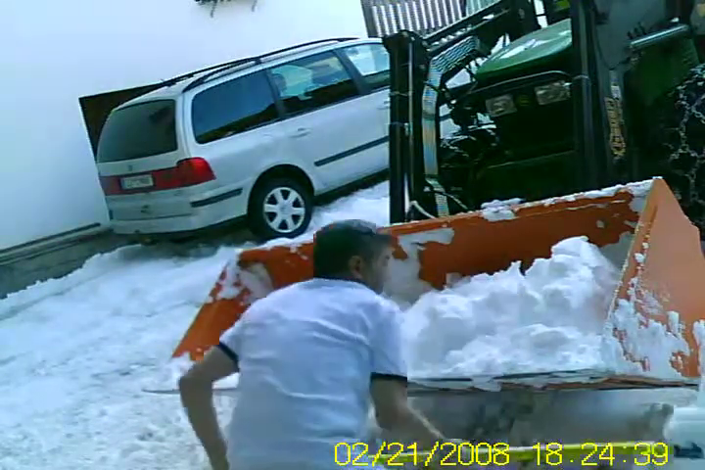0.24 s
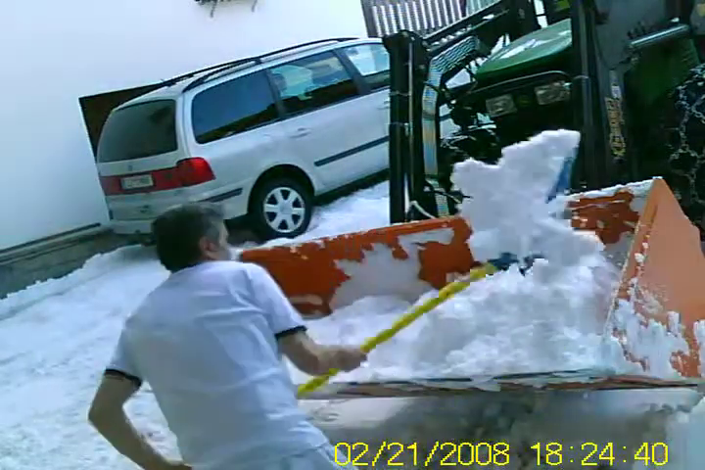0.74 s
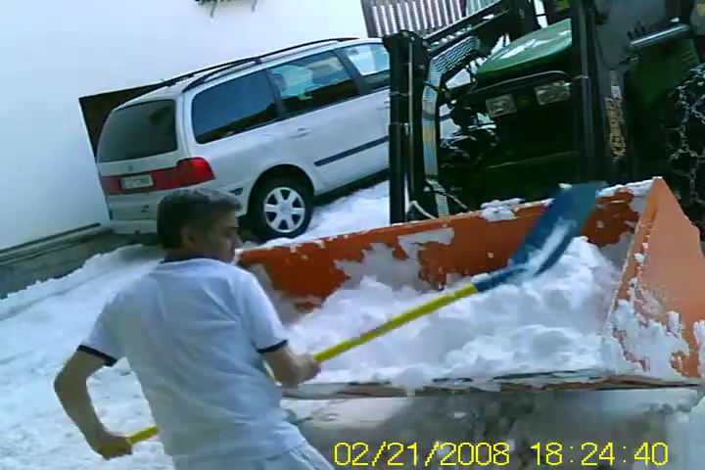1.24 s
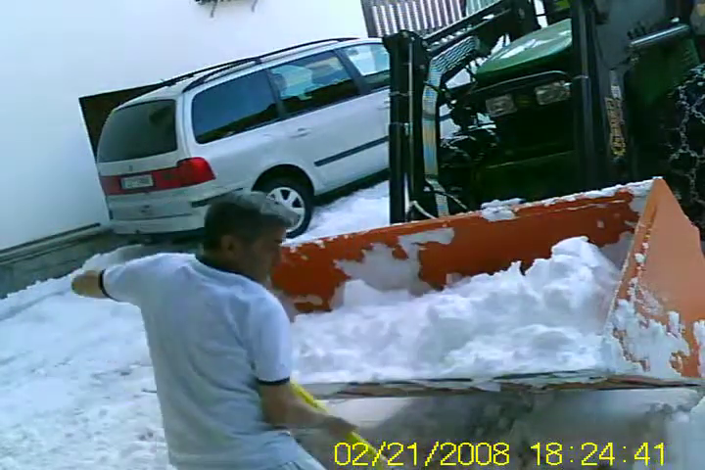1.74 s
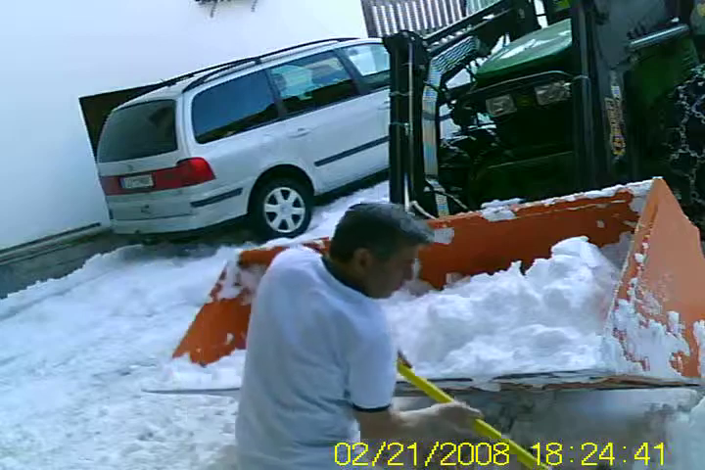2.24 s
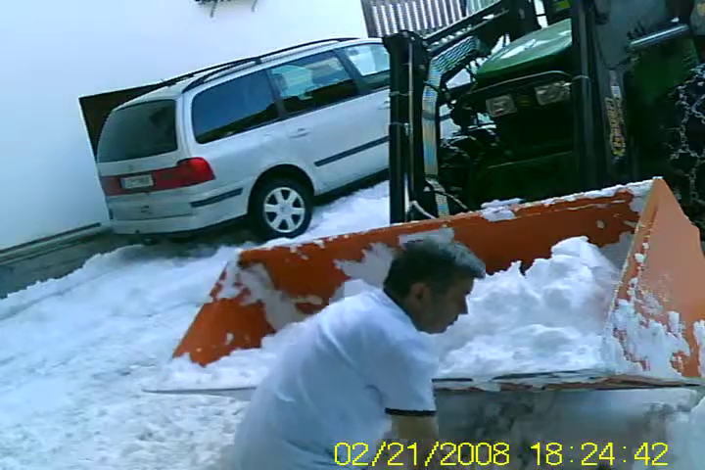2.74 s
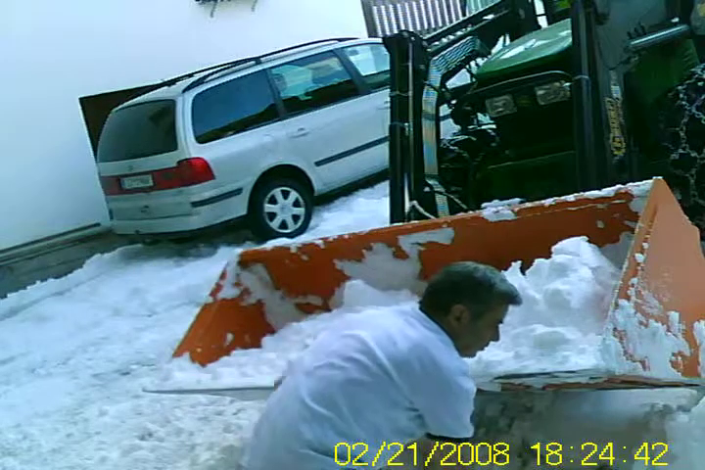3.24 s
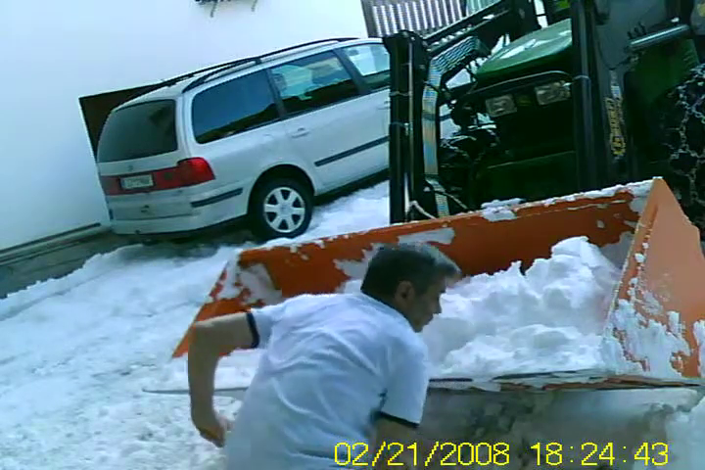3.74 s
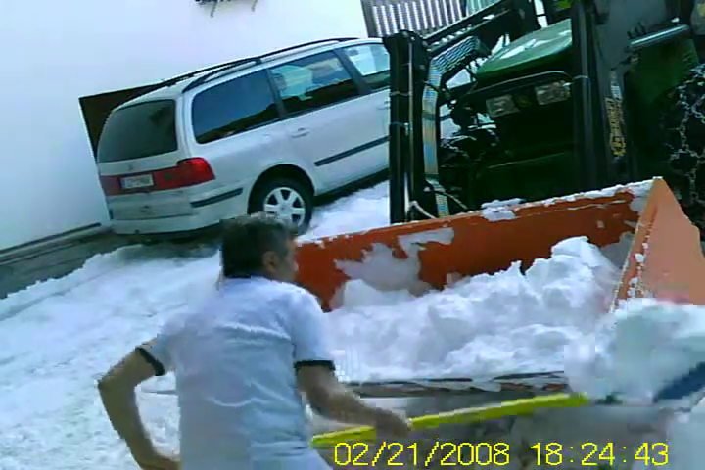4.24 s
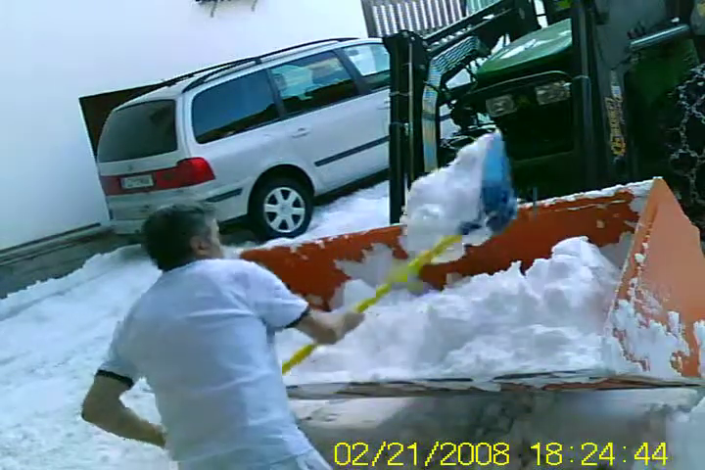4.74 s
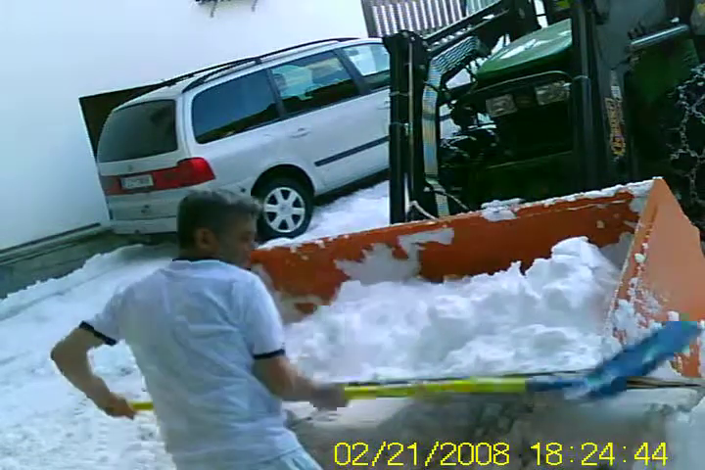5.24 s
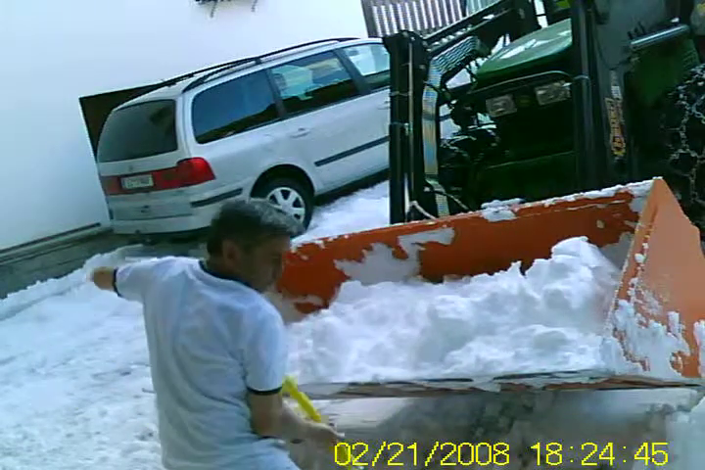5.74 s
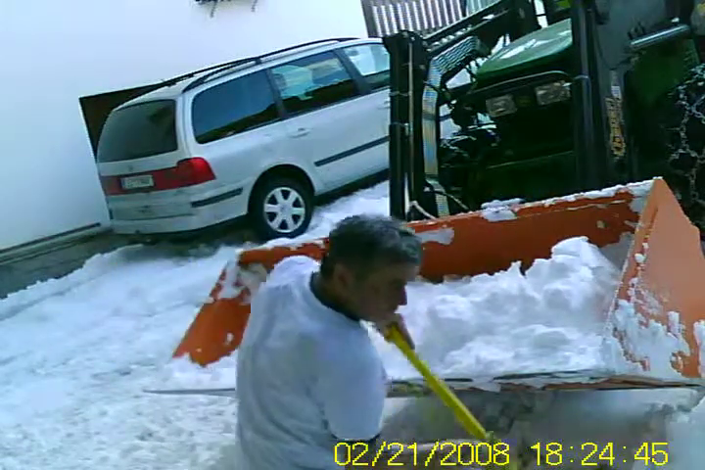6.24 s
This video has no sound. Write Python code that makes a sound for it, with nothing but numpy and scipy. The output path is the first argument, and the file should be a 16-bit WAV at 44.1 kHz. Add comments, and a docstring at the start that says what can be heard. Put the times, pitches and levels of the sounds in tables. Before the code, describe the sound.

Faint hiss and a low rumble of air fill a lightly echoing yard. A small bird, some way off, chirps briefly about once a second until 5.5 seconds. Close by, a shovel knocks softly at 0.4 seconds, and wet snow slides off and lands around 1 second. At 1.9 seconds the blade skids over icy grit, catches with a rattling clang at 2 and stops with a tiny squeak at 2.3. A heavy, crunching thump of snow comes at 3.3. The blade knocks hollowly on its shaft at 4.4, and another load lands with a crisp crunch at 5. From about 5.8 seconds the blade brushes and skids again, then at 6.1 crashes against a steel tractor bucket. This is the loudest moment, slightly overloading the microphone, and the bucket rings and growls under the scraping until about 6.5 seconds.

```python
"""A small bird chirps over faintly rumbling air while snow is shovelled into a steel tractor bucket.
Twice the blade skids over icy ground, sticking and slipping on grit, and catches with a rattling clang,
the second time hard against the bucket, which rings and growls. Loads of wet snow knock the blade on its
shaft, slide off and land with a thump and a crunch of breaking crystals. House walls echo round the yard."""
import sys
import numpy as np
from scipy import signal
from scipy.fft import rfft, irfft, next_fast_len
from scipy.io import wavfile

SR = 44100
rng = np.random.default_rng(int(sys.argv[2]) if len(sys.argv) > 2 else 0)


def put_to_file(sound):
    """Save the sound as 16-bit audio at rate SR, in the file named by the first command-line argument."""
    columns = np.atleast_2d(sound).T  # one column per channel
    safe = np.clip(columns, -1, 1)
    whole_steps = np.round(safe * 32767)
    wavfile.write(sys.argv[1], SR, whole_steps.astype(np.int16))


N = 287091
TIME = np.arange(N) / SR

# Pushes of the blade. Each row: touch-down, catch and stop in seconds, then the levels of skid,
# singing, ploughing, judder and contact with the bucket in dB.
PUSHES = [(1.863, 2.038, 2.315, -45.5, -60, -47, -42, -21), (5.877, 6.119, 6.45, -49, -51, -32.5, -45, 8)]
# The steel bucket's modes. Each row: frequency in Hz, relative level in dB, free t60 in seconds.
BUCKET_MODES = [(203, -17, .8), (363, 0, .7), (405, -5, .3), (446, 1, .42), (490, -6, .3), (560, -6, .25),
                (623, -2, .4), (690, -5, .3), (767, 3, .33), (821, 2, .33), (877, -4, .25), (965, -5, .25),
                (1255, -3, .2), (1318, -2, .18), (1447, 1, .2), (1520, 0, .18), (1590, -2, .18),
                (1685, -7, .22), (1853, -5, .22), (2147, -12, .16), (2452, -13, .12)]


def from_db(db):
    """Decibels to gain."""
    return 10 ** (np.asarray(db) / 20)


def rms_one(x):
    """Scale to an rms of 1."""
    return x / np.sqrt(np.mean(x ** 2) + 1e-20)


def coloured(x, spectrum):
    """Shape a steady signal with a spectrum that falls away beyond its ends; rms 1."""
    hz, db = np.transpose(spectrum)
    size = next_fast_len(N)
    log_hz = np.log(np.maximum(np.arange(size // 2 + 1) * SR / size, 1))
    skirts = np.minimum(log_hz - np.log(hz[0]), 0) + np.minimum(np.log(hz[-1]) - log_hz, 0)
    gain = from_db(np.interp(log_hz, np.log(hz), db) + 20 * skirts)
    return rms_one(irfft(rfft(x, size) * gain, size)[:N])


def low_pass(x, hz, order=2):
    """Causal low-pass."""
    return signal.sosfilt(signal.butter(order, hz, fs=SR, output="sos"), x + 1e-18)


def high_pass(x, hz, order=2):
    """Causal high-pass."""
    return signal.sosfilt(signal.butter(order, hz, "high", fs=SR, output="sos"), x + 1e-18)


def rising(s, length):
    """Envelope that climbs from 0 to 1, starting at time s."""
    return np.clip((TIME - s) / length, 0, 1)


def dying(s, t60):
    """Envelope that jumps to 1 at time s and dies away."""
    age = TIME - s
    return (age >= 0) * from_db(-60 * np.clip(age / t60, 0, 3))


def swells(rows):
    """Bell-shaped swells. Each row: centre and half length in seconds, peak level in dB."""
    return sum(from_db(db) * np.exp(-.5 * np.minimum(((TIME - s) / half) ** 2, 100))
               for s, half, db in rows)


def clicks(times, gains):
    """A train of single-sample blows."""
    out = np.zeros(N)
    out[np.clip(np.round(np.asarray(times) * SR).astype(int), 0, N - 1)] = gains
    return out


def ring(drive, hz, t60):
    """One mode: a unit click sets a sine of height 1 ringing."""
    r, w = np.exp(-np.log(1000) / (t60 * SR)), 2 * np.pi * hz / SR
    return signal.lfilter([0, np.sin(w)], [1, -2 * r * np.cos(w), r * r], drive + 1e-18)


def struck(times, blow_db, modes, scatter_db):
    """Every blow meets each mode with a strength and sign of its own."""
    total = np.sqrt(np.sum(from_db(np.array(modes)[:, 1]) ** 2) / 2)
    out = np.zeros(N)
    for hz, db, t60 in modes:
        strength, side = rng.standard_normal((len(times), 2)).T
        gains = np.sign(side) * from_db(blow_db + db + scatter_db * strength)
        out += ring(clicks(times, gains), hz, t60)
    return out / total


def dense_modes(times, blow_db, spectrum, t60):
    """Dying bursts of coloured noise, like the countless close modes of a struck plate."""
    envelope = np.sqrt(sum((from_db(db) * dying(s, t60)) ** 2 for s, db in zip(times, blow_db)))
    return envelope * coloured(rng.standard_normal(N), spectrum)


def grains(per_s, spread_db):
    """Ice crystals break at random moments; the wider the spread, the more a few stand out."""
    sizes = from_db(spread_db * np.minimum(rng.exponential(1, N), 4))
    return rms_one((rng.random(N) < per_s / SR) * sizes * rng.choice([-1, 1], N))


def waver(hz):
    """A random wobble, up to about hz times a second; rms 1."""
    return rms_one(low_pass(rng.standard_normal(N), hz))


def air():
    """Quiet outdoor hiss over a deep rumble that swells with each gust."""
    # Soft gusts. Each row: centre and half length in seconds, level in dB.
    gusts = [(1.3, 0.29, -44), (2.9, 0.84, -47.5), (5.55, 0.36, -42.5)]
    # Colours of the rumble and the hiss. Each row: frequency in Hz, relative level in dB.
    rumble_spectrum = [(8, 11.5), (18, 10), (30, -2.5), (45, 3), (65, -12.5), (90, -13), (130, -22.5),
                       (300, -58)]
    hiss_spectrum = [(59, -33), (100, -1.5), (124, -9), (177, -6), (262, -12), (359, -8), (388, -9.5),
                     (420, -14), (758, -17.5), (1220, -17.5), (1370, -17.5), (8520, -27.5), (11000, -30),
                     (14300, -67), (22000, -120)]
    calm_db, hiss_db = -50.5, -58
    rumble = np.hypot(from_db(calm_db), swells(gusts)) * coloured(rng.standard_normal(N), rumble_spectrum)
    return rumble + from_db(hiss_db) * coloured(rng.standard_normal(N), hiss_spectrum)


def bird():
    """Whistled notes that glide, arch and warble a little; the call repeats with slight changes."""
    # The calls. Each row: time in seconds, level in dB, pitch ratio.
    calls = [(0.364, -58.5, 0.97), (0.47, -51.5, 0.96), (1.454, -48.5, 0.98), (2.951, -48.5, 0.95),
             (3.684, -47, 0.99), (4.709, -51, 0.98), (5.538, -52.5, 0.96)]
    # One call, a thin upslur and two arches. Each row: delay and length in seconds,
    # start pitch, end pitch and arch height in Hz, relative level in dB.
    notes = [(-.036, .033, 4280, 5430, -200, -18), (0, 0.0353, 3167, 3370, 848, 2.5),
             (0.034, .042, 2600, 2500, 900, -11)]
    arch_lean, scatter_db = .75, 1.0  # a lean below 1 brings the top of the arch early
    warble = 1 + .016 * waver(hz=110)
    out = np.zeros(N)
    for s, call_db, ratio in calls:
        for delay, length, start_hz, end_hz, arch_hz, db in notes:
            span = (TIME > s + delay) & (TIME < s + delay + length)
            along = ((TIME[span] - s - delay) / length) ** arch_lean
            arch = 4 * along * (1 - along)
            pitch = ratio * warble[span] * (start_hz + (end_hz - start_hz) * along + arch_hz * arch)
            gain = from_db(call_db + db + scatter_db * rng.standard_normal())
            out[span] += gain * arch * np.sqrt(2) * np.sin(2 * np.pi * np.cumsum(pitch) / SR)
    return out


def shaft():
    """Hollow knocks as the load rocks the blade on its shaft."""
    # The knocks. Each row: start in seconds, level in dB.
    knocks = [(0.361, -56), (0.376, -55), (4.4, -42), (4.412, -49)]
    # The shaft's modes. Each row: frequency in Hz, relative level in dB, t60 in seconds.
    modes = [(417, 4.5, 0.12), (1040, 0, 0.078), (1257, 7.5, 0.083), (1486, -4, 0.079), (1790, 3.5, 0.045)]
    s, db = np.transpose(knocks)
    return struck(s, db, modes, scatter_db=1.5)


def snow():
    """A soft weight lands with a low thump and a crunch of crystals; powder and crumbs trickle down."""
    # Landing lumps and heavy steps. Each row: start in seconds, thump and crunch drive in dB,
    # crunch t60 in seconds, crunch cutoff in Hz.
    thuds = [(0.375, -46, -57, 0.11, 1490), (1.009, -42.5, -57.5, 0.18, 3000), (1.11, -50, -51, 0.68, 1200),
             (3.308, -31.5, -40.5, 0.19, 1500), (3.34, -30.5, -38.5, .2, 8200),
             (3.351, -20.5, -36.5, 0.06, 3000), (3.363, -20, -33, 0.033, 4000),
             (3.408, -32.5, -55, .15, 1500), (4.412, -48, -46.5, 0.089, 700), (4.994, -46, -45, 0.18, 7000),
             (5.0407, -58, -31, 0.18, 7700), (5.077, -48, -33.5, 0.21, 1330)]
    # The thump's modes. Each row: frequency in Hz, relative level in dB, t60 in seconds.
    thump_modes = [(138, -20, 0.1), (211.4, 0.5, 0.099), (280, 3, 0.043), (350, -5.5, 0.08),
                   (422, -10.5, 0.17)]
    # Loose snow sliding off the blade. Each row: centre and half length in seconds, level in dB.
    spills = [(.81, .06, -59.5), (1.16, 0.076, -60), (4.6, 0.12, -67), (4.99, 0.053, -64)]
    # Crumbs of ice ticking down. Each row: start in seconds, level in dB.
    ticks = [(.955, -55.5), (1.024, -63), (1.371, -55)]
    # Colours of the crunch and the powder. Each row: frequency in Hz, relative level in dB.
    crunch_spectrum = [(100, 6.5), (350, 7), (780, 8), (1200, 2.5), (1650, 10.5), (2050, 2), (2500, -4.5),
                       (3200, -6.5), (4100, 3), (5200, -5), (11000, -13.5)]
    powder_spectrum = [(300, -12), (1200, -6), (2500, -3), (4000, 0), (7500, -1), (11000, -5)]
    s, thump_db = np.transpose(thuds)[:2]
    soft_blows = low_pass(clicks(s, from_db(thump_db)), 330)
    thumps = high_pass(sum(from_db(db) * ring(soft_blows, hz, t60) for hz, db, t60 in thump_modes), 180)
    crystals = coloured(grains(per_s=9000, spread_db=2.2), crunch_spectrum)
    crunch = np.zeros(N)
    for start, _, db, t60, cutoff_hz in thuds:
        collapse = low_pass(dying(start, t60), 75, order=1)  # the lump gives way over a few milliseconds
        crunch += from_db(db) * low_pass(crystals * collapse, cutoff_hz, order=1)
    trickle = swells(spills) + sum(from_db(db) * dying(start, t60=0.076) for start, db in ticks)
    return thumps + crunch + trickle * coloured(grains(per_s=2500, spread_db=2.5), powder_spectrum)


def push(touch_s, catch_s, stop_s, skid_db, sing_db, plough_db, judder_db, contact_db):
    """The blade skids, catches with a jolt, ploughs on and stops: gains of grit, singing, judder, growl."""
    bite = rising(catch_s, length=0.061)
    gliding = rising(touch_s, length=0.073) * (1 - bite)
    skid = from_db(skid_db) * gliding
    jolt = from_db(16) * dying(catch_s, t60=.25)
    moving = (TIME < stop_s) + dying(stop_s, t60=0.88)
    force = bite * (1 + jolt) * moving
    grit = skid + from_db(plough_db) * force
    judder = from_db(-14) * skid + from_db(judder_db) * force
    growl = from_db(-11.5) * skid + from_db(contact_db - 24.5) * bite * dying(catch_s, t60=1.16)
    return grit, from_db(sing_db) * gliding, judder, growl


def scraping():
    """The edge sticks and slips over grit; slower slips shake the blade and keep the bucket ringing."""
    # The freely skidding blade sings. Each row: frequency in Hz, relative level in dB, t60 in seconds.
    skid_modes = [(1531, 10, 0.25), (1775, -1, 0.085)]
    # The blade squeaks once, and brushes the ground on its way down.
    # Each row: centre and half length in seconds, level in dB.
    squeaks = [(2.295, .014, -50)]
    brushes = [(5.685, 0.018, -56), (5.80, 0.018, -47.5)]
    # Colours of the grit and the judder. Each row: frequency in Hz, relative level in dB.
    grit_spectrum = [(150, -50), (400, -24), (900, 1), (1200, -0.5), (1600, 8.5), (1950, 5.5), (2300, -9.5),
                     (3100, -8.5), (4100, -2.5), (5000, -9), (7500, -7.5), (8800, -17), (12000, -21)]
    judder_spectrum = [(40, -3), (100, -1), (150, 3), (200, 4), (290, -2), (440, -6.5), (650, -15),
                       (1500, -19)]
    grit_gain, sing_gain, judder_gain, growl_gain = np.sum([push(*row) for row in PUSHES], axis=0)
    slips = grains(per_s=9000, spread_db=2.0) * from_db(1.93 * waver(hz=71))
    grit = (grit_gain + swells(brushes)) * coloured(slips, grit_spectrum)
    shove = high_pass(low_pass(slips, 950), 380, order=4)
    damping = .3  # the blade pressing on the steel shortens its ring to a hollow growl
    steel = sum(ring(shove, hz, damping * t60) * from_db(db) / np.sqrt(t60) for hz, db, t60 in BUCKET_MODES)
    singing = sing_gain * rms_one(sum(from_db(db) * ring(slips, hz, t60) for hz, db, t60 in skid_modes))
    squeak = swells(squeaks) * rms_one(ring(slips, hz=3980, t60=0.072))
    judder = judder_gain * coloured(grains(per_s=460, spread_db=0.0), judder_spectrum)
    return grit + judder + growl_gain * rms_one(steel) + singing + squeak


def strikes():
    """The edge cracks on each catch and the blade rings; the bucket joins in as hard as it is touched."""
    # Blows on the blade. Each row: start in seconds, ring drive in dB, edge crack in dB.
    blows = [(2.0282, -20.5, -25), (2.0400, -19.5, -14), (2.0437, -22.5, -16), (6.1280, -17, -1),
             (6.1383, -18, -4), (6.1446, -16, 1), (6.1497, -24, -3), (6.170, -18, -4), (6.1806, -26.5, -4),
             (6.286, -28.5, -21.5), (6.356, -29.5, -25), (6.438, -42, -16)]
    # The blade's modes. Each row: frequency in Hz, relative level in dB, t60 in seconds.
    blade_modes = [(395, 0, 0.14), (436, 2.5, 0.1), (588, -1, 0.17), (819, -6, 0.22), (930, -5, 0.13),
                   (1060, -2.5, .13), (1297, 1, 0.06), (1470, -0.5, 0.076), (1882, -12, 0.091),
                   (3770, -25, 0.054)]
    # Colours of the two clangs, the edge's crack and a dull low thud under each crack.
    # Each row: frequency in Hz, relative level in dB.
    blade_clang = [(100, -15), (250, 10.5), (450, 8), (900, 9.5), (1500, 6.5), (1950, 8), (2300, -15.5),
                   (4000, 1), (7500, -6), (9000, -20), (12000, -10)]
    bucket_clang = [(150, -39), (280, -9), (420, -24), (800, -0.5), (1100, -13), (1500, 4.5), (1900, -8),
                    (2400, -7), (4000, -12), (7500, -27), (9000, -24), (12000, -40)]
    crack_spectrum = [(500, -13), (1800, -2), (3200, -1.5), (4500, 1), (7000, -0.5), (9000, -5),
                      (12000, -10)]
    low_thud_spectrum = [(25, -1), (90, -4.5), (200, -9), (320, -16)]
    s, blade_db, crack_db = np.transpose(blows)
    touch_s, *_, contact_db = np.transpose(PUSHES)
    which_push = np.searchsorted(touch_s, s) - 1
    bucket_db = blade_db + contact_db[which_push]
    blade = from_db(-1.5) * struck(s, blade_db, blade_modes, scatter_db=1.4)
    blade += from_db(-7.5) * dense_modes(s, blade_db, blade_clang, t60=0.23)
    # a sharp tap on the lip hardly moves the bucket's slowest modes
    bucket = from_db(-6.5) * high_pass(struck(s, bucket_db, BUCKET_MODES, scatter_db=0.1), 620)
    bucket += dense_modes(s, bucket_db, bucket_clang, t60=0.049)
    low_thud = dense_modes(s, crack_db - 21, low_thud_spectrum, t60=.06)
    snap = sum(from_db(db) * dying(start, t60=0.0038) for start, db in zip(s, crack_db))
    return blade + bucket + low_thud + snap * coloured(rng.standard_normal(N), crack_spectrum)


def yard(x):
    """Scattered echoes from the walls, arriving a little late and a little dull."""
    echoes = low_pass(rng.standard_normal(N) * dying(0.0061, t60=.4), 3000, order=1)[:SR]
    return signal.fftconvolve(x, echoes / np.sqrt(np.sum(echoes ** 2)))[:N]


def scene():
    """The work is close by; the bird is farther off and has more echo."""
    work = strikes() + scraping() + shaft() + snow()
    chirps = bird()
    echoes = yard(from_db(-13) * work + from_db(-10) * chirps)
    return (work + chirps + echoes + air())[None]


def record(dry):
    """A small microphone with little top and a steady offset; the hardest blows overload it."""
    top_hz, overload, cutoff_hz, offset = 10710, .76, 16600, -.0114
    narrow = signal.sosfilt(signal.ellip(7, .3, 70, top_hz, fs=SR, output="sos"), dry)
    clipped = narrow / (1 + (narrow / overload) ** 8) ** (1 / 8)
    top_cut = signal.firwin(201, cutoff_hz, window="blackman", fs=SR)
    return signal.fftconvolve(clipped, top_cut[None], "same") + offset


dry = scene()
out = record(dry)
put_to_file(out)
```